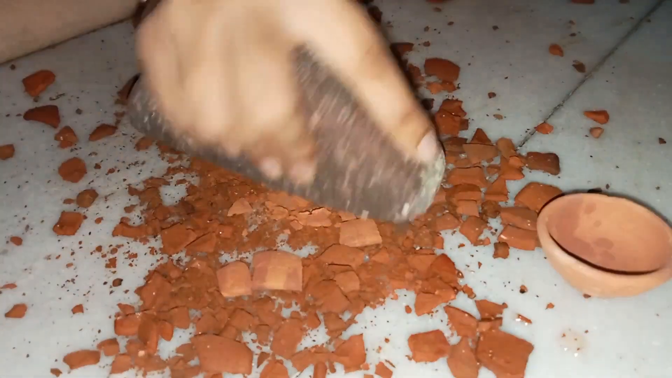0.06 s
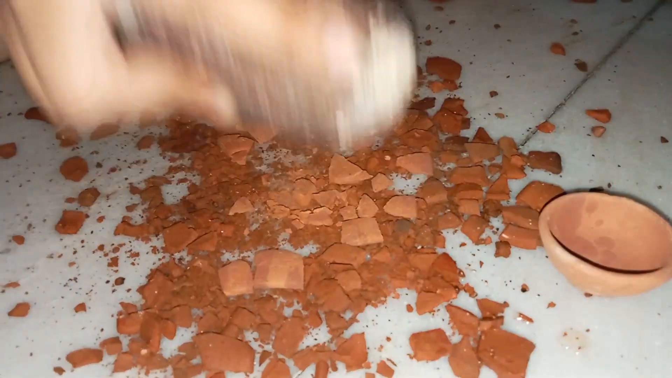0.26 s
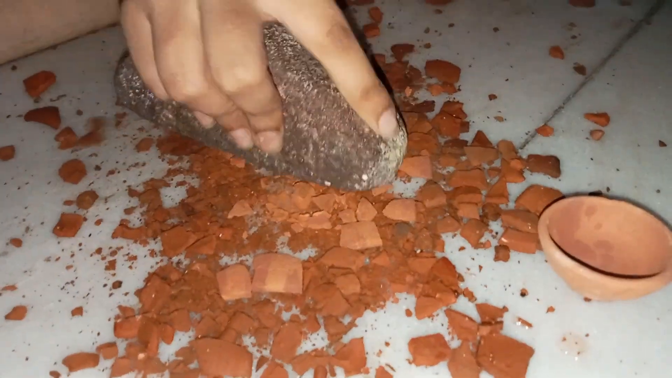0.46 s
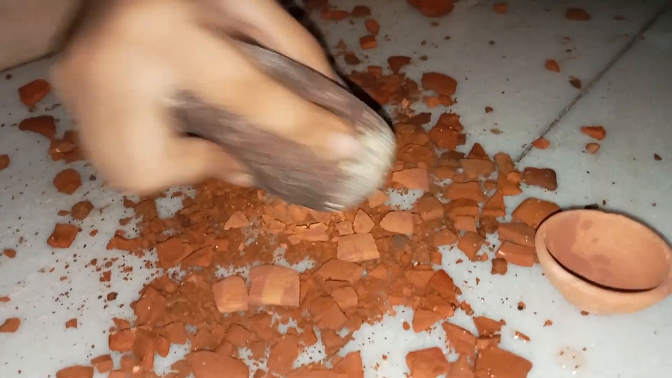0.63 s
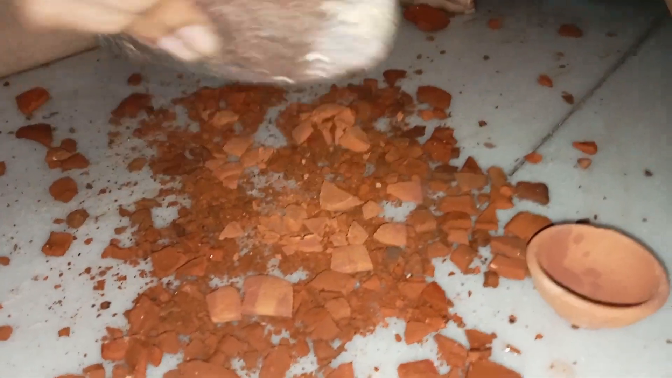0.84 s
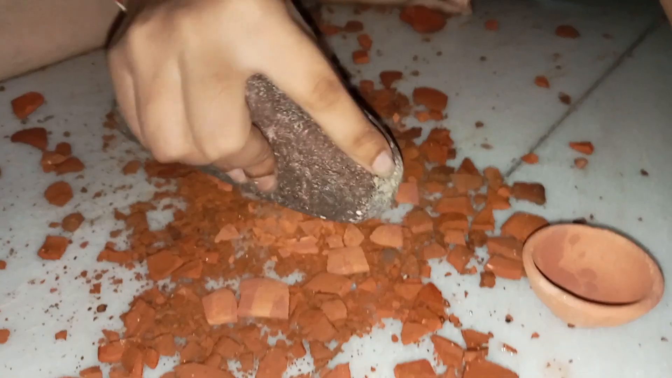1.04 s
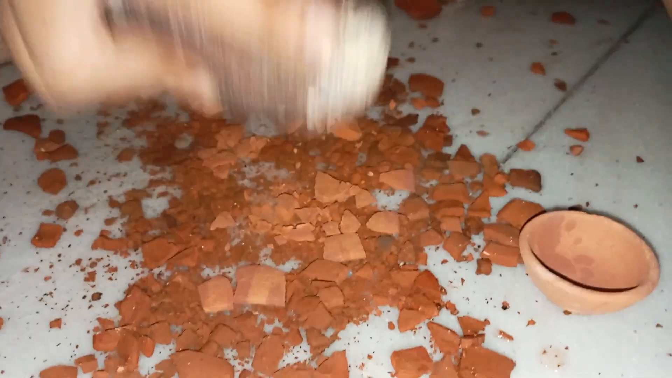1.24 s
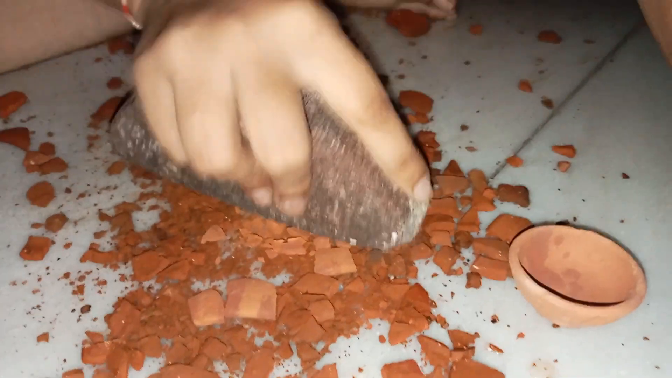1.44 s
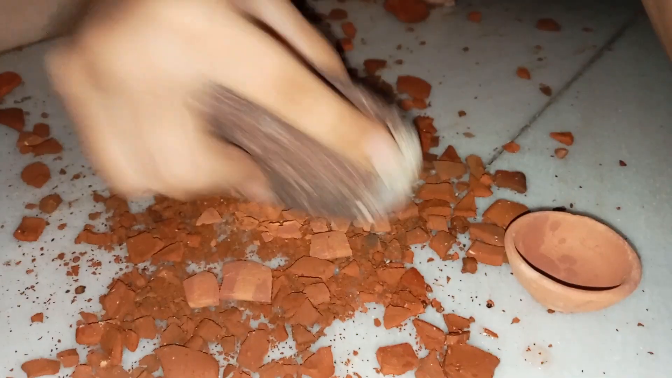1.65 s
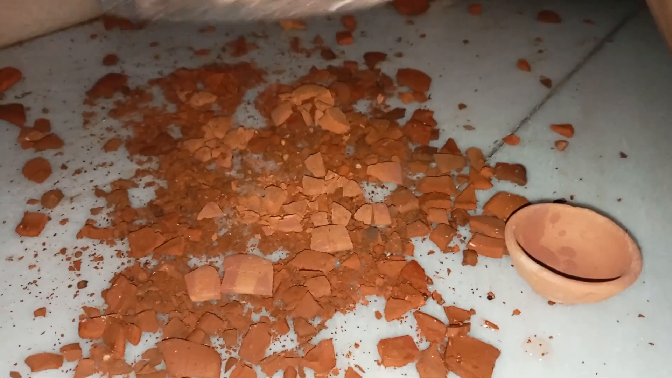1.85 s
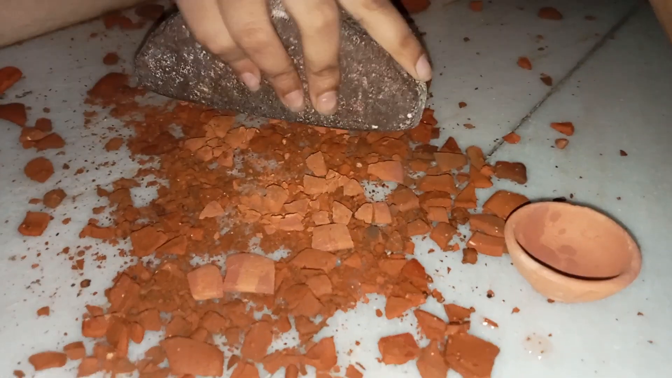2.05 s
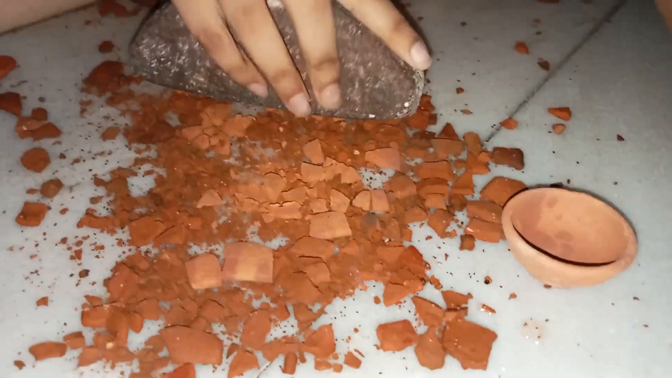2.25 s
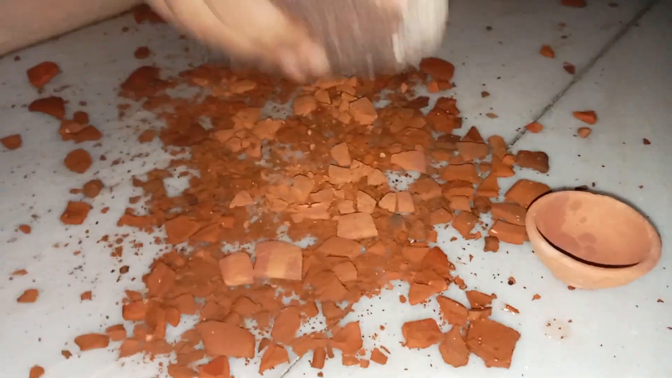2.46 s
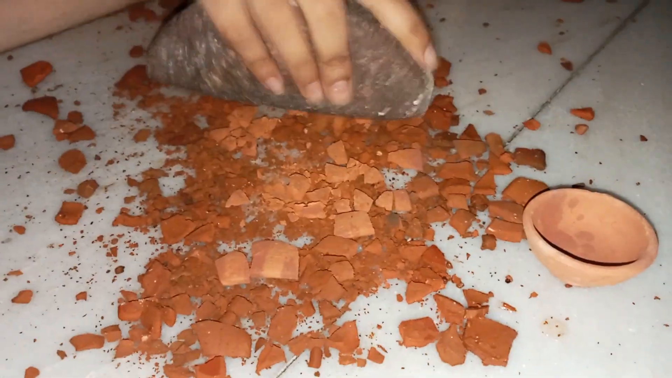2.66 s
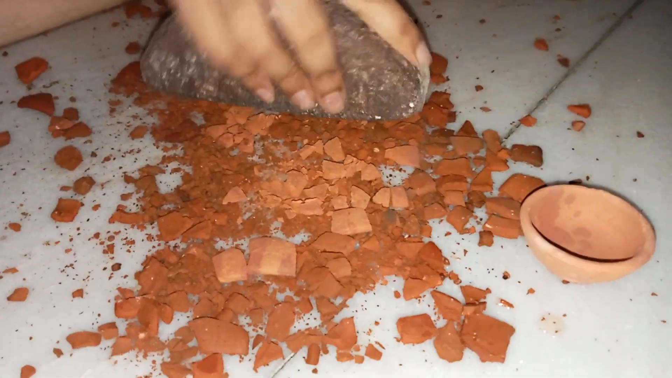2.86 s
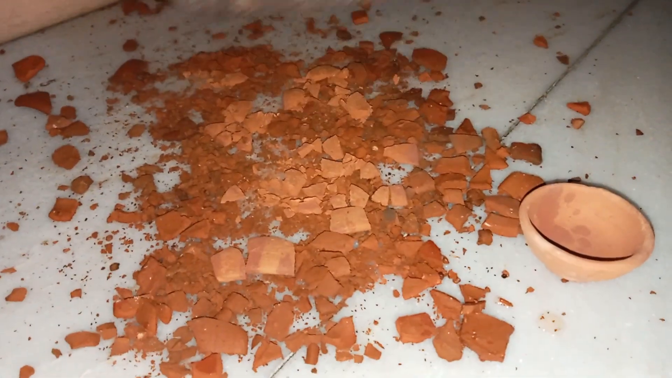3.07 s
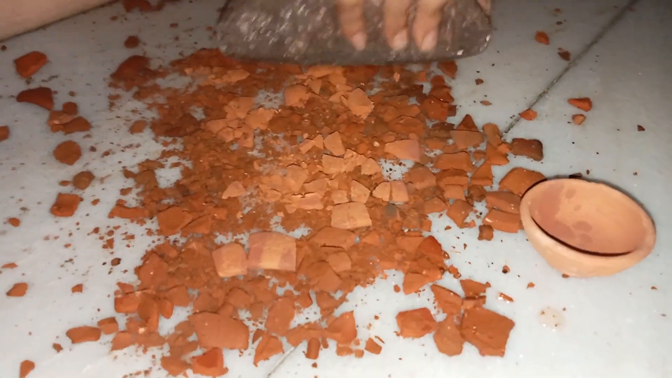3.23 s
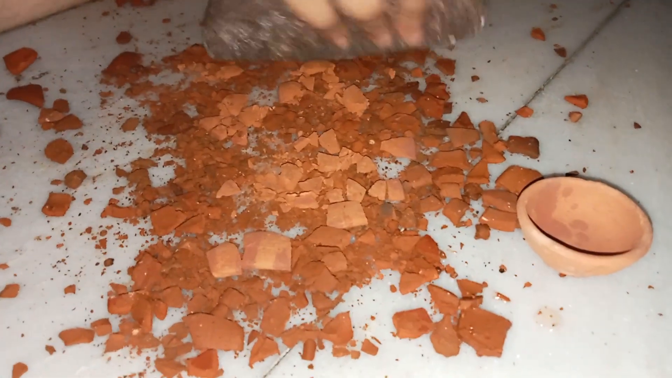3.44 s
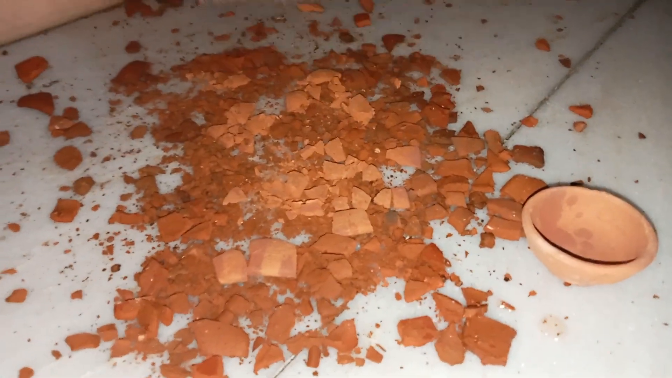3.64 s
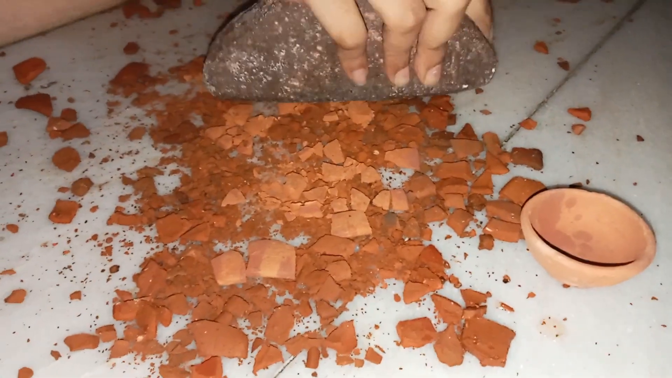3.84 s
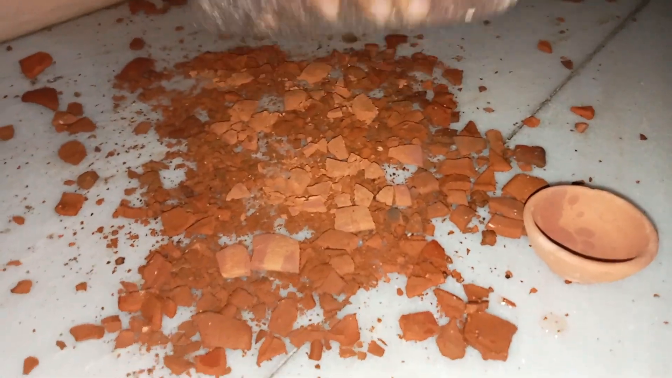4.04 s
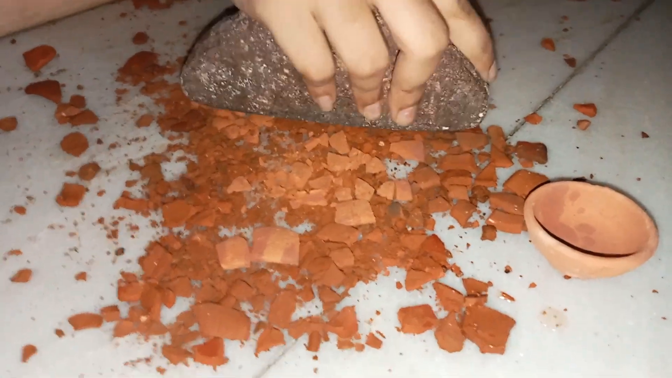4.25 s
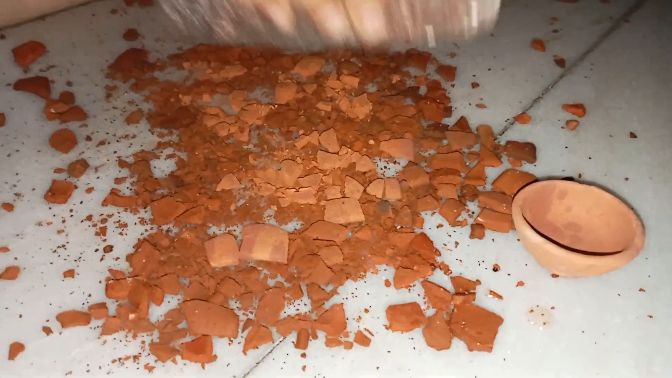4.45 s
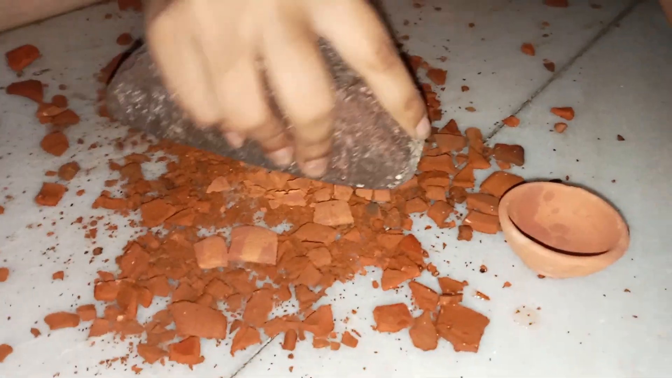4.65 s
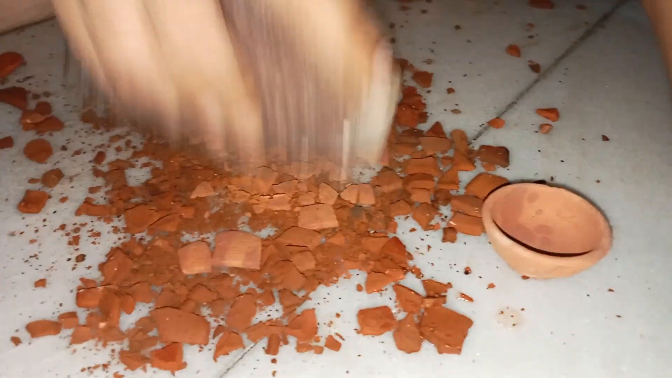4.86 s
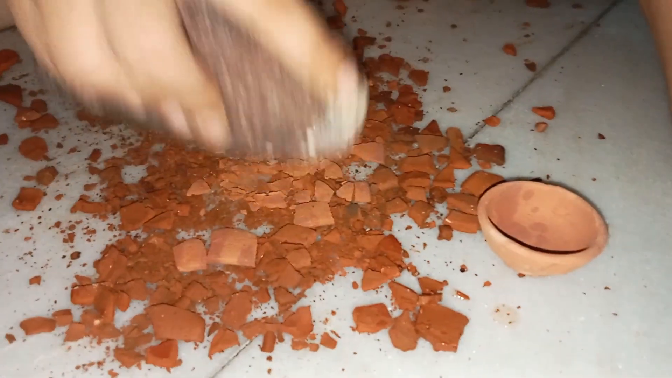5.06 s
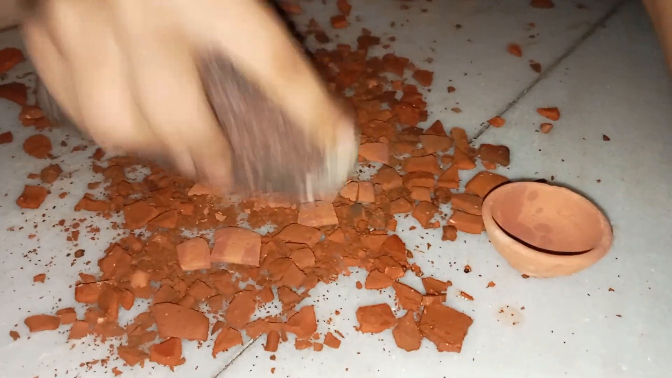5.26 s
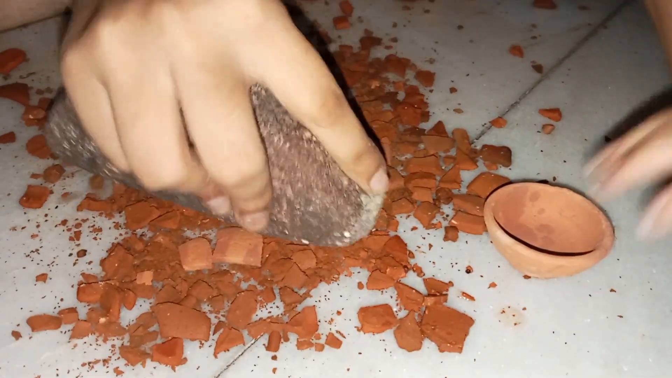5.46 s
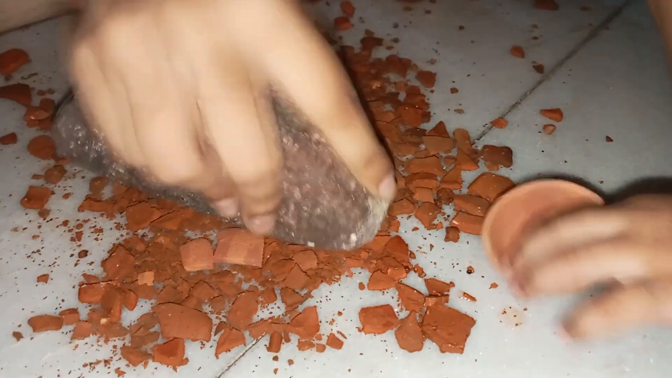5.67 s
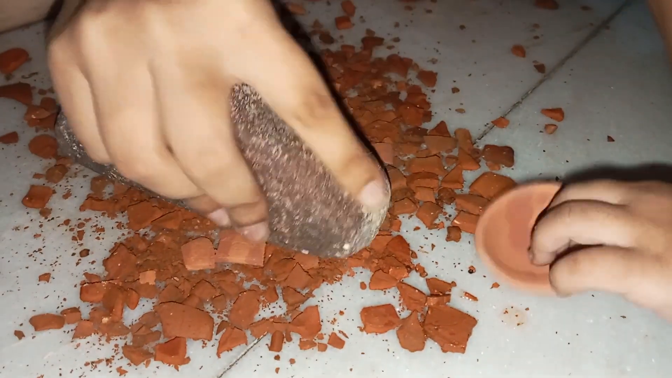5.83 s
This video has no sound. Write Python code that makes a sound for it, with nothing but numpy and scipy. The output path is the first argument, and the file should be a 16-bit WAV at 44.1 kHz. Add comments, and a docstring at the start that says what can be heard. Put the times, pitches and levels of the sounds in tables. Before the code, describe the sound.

Close, repeated knocks of a hand-held stone crushing pottery shards on tiles, with brief rattles and a short room echo.

```python
"""A sharp crack, knock and thud, close up: a hand-held stone pounds a heap of broken clay lamps on the
tiled floor of a bare room. Each blow crushes the top shards, then drives the floor; a short, bright
rattle follows about 13 ms later. Between blows crumbs tick, grit sifts and the room rings on over a
faint hiss. The microphone is close to the heap and overloads on the impacts."""
import sys
import numpy as np
from scipy import signal
from scipy.fft import rfft, irfft
from scipy.io import wavfile

SR = 44100
rng = np.random.default_rng(int(sys.argv[2]) if len(sys.argv) > 2 else 0)


def log_audio(samples):
    """Write samples as a 16-bit WAV file to the path given in sys.argv[1]."""
    # one column per channel
    frames = np.atleast_2d(samples).T
    # limit to full scale, then quantise
    limited = np.clip(frames, -1, 1)
    pcm = np.round(limited * 32767).astype(np.int16)
    wavfile.write(sys.argv[1], SR, pcm)


N = 260190
EVENT_SAMPLES = SR // 10
EVENT_T = np.arange(EVENT_SAMPLES) / SR


def from_db(db):
    """Decibels to gain."""
    return 10 ** (np.asarray(db) / 20)


def unit_rms(x):
    """Scale to rms 1."""
    return x / np.sqrt(np.mean(x ** 2) + 1e-20)


def at_hz(points, hz):
    """Read a table on a log-frequency axis."""
    freqs, values = np.array(points).T
    return np.interp(np.log(hz), np.log(freqs), values)


def add(out, s, sound):
    """Mix a sound in at time s."""
    i = max(round(s * SR), 0)
    out[i:i + len(sound)] += sound[:N - i]


def cut(x, hz, kind, order=2):
    """Butterworth filter."""
    return signal.sosfilt(signal.butter(order, np.clip(hz, 10, .48 * SR), kind, fs=SR, output="sos"), x)


def ring(force, modes):
    """Each mode answers a click with a dying sine."""
    out = 0
    for hz, db, t60 in modes:
        r, w = np.exp(-np.log(1000) / (t60 * SR)), 2 * np.pi * hz / SR
        out += signal.lfilter([0, from_db(db) * np.sin(w)], [1, -2 * r * np.cos(w), r * r], force + 1e-18)
    return out


def contact(hardness_hz, order=2):
    """The force of one contact: the softer it is, the longer and duller."""
    return cut(signal.unit_impulse(EVENT_SAMPLES) + 1e-18, hardness_hz, "low", order)


def fractures(envelope, cracks_per_s=12000, spread_db=3):
    """Tiny cracks of random size and sign, densely packed under an envelope."""
    born = rng.random(EVENT_SAMPLES) < cracks_per_s / SR
    sizes = from_db(spread_db * rng.standard_normal(EVENT_SAMPLES))
    return envelope * born * sizes * rng.choice([-1, 1], EVENT_SAMPLES)


# the background of the bare room: (frequency [Hz], relative density [dB])
HISS_SPECTRUM = [(20, -58), (40, -7), (110, 0.5), (200, 8), (600, -5), (1200, -4), (2500, -7.5),
                 (4000, -12.5), (4600, -19), (5300, -31.5), (7000, -39.5), (15000, -45.5)]


def hiss(level_db=-48.5):
    """Smooth, steady noise far behind the pounding."""
    hz = np.maximum(np.fft.rfftfreq(N, 1 / SR), 1)
    spectrum = rfft(rng.standard_normal(N)) * from_db(at_hz(HISS_SPECTRUM, hz))
    return from_db(level_db) * unit_rms(irfft(spectrum, N))


# what the walls send back to the microphone: (frequency [Hz], relative density [dB])
ECHO_SPECTRUM = [(50, -11.5), (100, -6.5), (160, -2), (230, 6), (330, 0), (550, 1.5), (800, 0), (1400, -10),
                 (2400, -5.5), (4000, -13.5), (6500, -13.5), (10000, -13.5), (15000, -19)]
# how long the room rings: (frequency [Hz], t60 [s])
ECHO_DECAY = [(80, 0.74), (210, 0.58), (560, 0.66), (1500, 0.69), (4000, 0.64), (10000, 0.42),
              (16000, 0.29)]
# standing waves between the walls: (frequency [Hz], gain [dB], t60 [s])
STANDING_WAVES = [(103.4, -76, 1.36), (158.92, -63.5, 0.36), (174.2, -62, 0.442)]


def room(x, build_s=.012, first_echo_s=.0056):
    """Dense echoes off the bare walls die band by band; a few standing waves hum on in the bass."""
    t = np.arange(SR) / SR
    onset = np.clip((t - first_echo_s) / build_s, 0, 1)
    edges_hz = np.geomspace(40, 17000, 22)
    white = rng.standard_normal((2, SR))
    response = 0
    for k, (low, high) in enumerate(zip(edges_hz, edges_hz[1:])):
        hz = np.sqrt(low * high)
        fade = np.exp(-np.log(1000) * t / at_hz(ECHO_DECAY, hz))
        band = unit_rms(cut(white[k % 2], [low, high], "band") * onset * fade)
        response += from_db(at_hz(ECHO_SPECTRUM, hz)) * band * np.sqrt(2 * (high - low)) / SR
    return signal.fftconvolve(x, response)[:N] + ring(x, STANDING_WAVES)


def blow_echoes(echo_variants=4, draws=2):
    """The room's diffuse echo, coloured a little differently from blow to blow."""
    groups = [STONE_BLOWS[k::echo_variants] for k in range(echo_variants)]
    return sum(room(blows(rows)[0]) for rows in groups for _ in range(draws)) / np.sqrt(draws)


def sifting(grains_per_s=2500, clump_db=4, fade_db_per_s=3, spray_db=-6):
    """Each blow sets fine grit sliding down the heap in little clumps, fading until the next one."""
    t = np.arange(N) / SR
    level_db = np.full(N, float(STONE_BLOWS[0][-1]))
    for s, *_, grit_db in STONE_BLOWS:
        level_db = np.where(t < s, level_db, grit_db - fade_db_per_s * (t - s))
    clumps = unit_rms(cut(rng.standard_normal(N), 14, "low"))
    born = rng.random(N) < grains_per_s / SR
    grains = born * rng.standard_normal(N) * from_db(clump_db * clumps)
    fizz = cut(grains, [9000, 10600], "band") + from_db(spray_db) * cut(grains, [4500, 15000], "band")
    return from_db(level_db) * unit_rms(fizz)


# the loudest crumbs dropping near the microphone: (time [s], peak level [dB])
CRUMB_TICKS = [(0.7874, -49), (0.809, -48.5), (0.844, -35.5), (3.474, -37.5), (4.718, -45), (5.883, -38)]
# the stone resting on the heap: (time [s], level [dB], pitch [Hz])
STONE_BUMPS = [(2.423, -30, 70.3), (2.471, -33, 143)]


def settling(chatter_s=.0043, bright_db=-7, bump_t60_s=.11):
    """Crumbs drop with short bright ticks, and the stone bumps softly as it is shifted."""
    out = np.zeros(N)
    for s, db in CRUMB_TICKS:
        chatter = fractures(np.exp(-EVENT_T / chatter_s))
        tick = cut(chatter, [2700, 4270], "band") + from_db(bright_db) * cut(chatter, [8500, 15000], "band")
        add(out, s, from_db(db) * tick / np.abs(tick).max())
    for s, db, hz in STONE_BUMPS:
        add(out, s, from_db(db) * ring(contact(hz * 2), [(hz, 0, bump_t60_s)]))
    return out


# resonances of the rattle just after each blow: (frequency [Hz], gain [dB], t60 [s])
RATTLE_MODES = [(1535, -4, 0.014), (2334, -0.5, 0.013), (2580, 7.5, 0.0084), (2920, -13.5, 0.0075),
                (4504, -12, 0.044)]


def rattle(decay_s=.003):
    """A short burst of clicks ringing near 2.6 kHz."""
    clicks = fractures(np.exp(-EVENT_T / decay_s))
    return unit_rms(cut(ring(clicks, RATTLE_MODES), [1300, 5000], "band"))


# large pieces breaking under the stone, close up: (time [s], level [dB])
LARGE_SNAPS = [(0.0539, -36.5), (0.5371, -26.5), (2.068, -42.5)]


def snaps(opening_s=.00061, running_s=.0024):
    """A crack runs through a large piece with a broad, bright burst."""
    out = np.zeros(N)
    envelope = np.minimum(EVENT_T / opening_s, 1) * np.exp(-EVENT_T / running_s)
    for s, db in LARGE_SNAPS:
        add(out, s, from_db(db) * unit_rms(cut(fractures(envelope), [3800, 8010], "band")))
    return out


# shards breaking on top of the heap: (frequency [Hz], width [Hz], level [dB])
SHARD_BANDS = [(1303, 450, -2), (1790, 1830, 3.5), (2780, 750, -5), (3870, 700, 5), (5200, 520, -13),
               (6730, 6900, -22), (9836, 1000, 4), (11780, 250, -5.5), (13900, 3200, -2.5)]


def crunch(crush_s, tilt_db, pivot_hz=4200, finest_hz=9200, packing_s=.0032, trickle_db=-25, trickle_s=.014):
    """Cracks swell as the stone bears down and die away as the heap packs; small shards ring higher."""
    peak_s = max(.64 * crush_s, 1e-4)
    after = np.maximum(EVENT_T - peak_s, 0)
    decay = np.exp(-after / packing_s) + from_db(trickle_db) * np.exp(-after / trickle_s)
    envelope = np.minimum(EVENT_T / peak_s, 1) * decay
    out = 0
    for hz, width, db in SHARD_BANDS:
        hz *= 1 + .02 * rng.standard_normal()  # no two pieces are the same size
        cracks = cut(fractures(envelope), [hz - width / 2, hz + width / 2], "band")
        octaves = np.log2(min(hz, finest_hz) / pivot_hz)
        out += from_db(db + tilt_db * octaves) * unit_rms(cracks)
    return out


# the tile and the stone on it, heard only close by: (frequency [Hz], gain [dB], t60 [s])
TILE_MODES = [(302, -3, 0.037), (341, -10, 0.042), (424, -6.5, 0.051), (540.8, 3, 0.038),
              (680.4, -5.5, 0.075), (865, -2.5, 0.034), (1284, -5.5, 0.058)]


def tile_ring(force, spread_db=2):
    """Each blow lands on another spot and so weights the tile's modes differently."""
    return ring(force, [(hz, db + spread_db * rng.standard_normal(), t60) for hz, db, t60 in TILE_MODES])


# the floor slab under the heap: (frequency at usual hardness [Hz], gain [dB], t60 [s])
SLAB_MODES = [(92, -10.5, 0.039), (150.3, 1.5, 0.021)]


def slab_thud(hardness_hz, usual_hardness_hz=760):
    """The slab gives way and pulls the air after it; a softer, thicker heap lowers the thud."""
    tuning = (hardness_hz / usual_hardness_hz) ** .28
    swing = ring(contact(hardness_hz=325), [(hz * tuning, db, t60) for hz, db, t60 in SLAB_MODES])
    return -cut(swing, 82.4, "high")


def knock(force, pitch_hz, slap_db=34, bounce_db=-1, cycles=11.5):
    """A broad slap, and the stone bouncing for a few cycles on the springy heap."""
    slap = from_db(slap_db) * cut(force, 220, "high")
    return slap + from_db(bounce_db) * ring(force, [(pitch_hz, 0, cycles / pitch_hz)])


# the stone striking the heap, close to the microphone; each level is relative to its own layer:
# (time [s], crushing before impact [s], thud [dB], knock [dB], knock pitch [Hz], hardness [Hz],
#  crunch [dB], crunch tilt [dB/octave], rattle [dB], grit afterwards [dB])
STONE_BLOWS = [(0.0554, 0.0013, 4.5, 2, 442, 1110, -42.5, -1.5, -40, -77),
               (0.5387, 0.0027, 7.5, -.5, 337, 800, -34.5, -2.5, -39, -63),
               (1.0415, 0.0017, 0, 1, 521, 787, -34.5, -4.5, -38.5, -76.5),
               (1.5325, 0.00177, 4.5, 1, 547, 914, -36.5, -2.5, -27.5, -86),
               (2.0702, .0017, 2, -10, 430, 595, -36, -3, -38, -79),
               (2.7551, .0014, 0, 0, 536, 1040, -39, -5.5, -42, -78),
               (3.303, 0.0019, -0.5, -5, 483, 645, -35.5, -2.5, -49, -87.5),
               (3.825, 0.0036, 2.5, -2.5, 324, 568, -35, -1.5, -35.5, -90),
               (4.2652, 0.0043, -5, -2, 294, 540, -38.5, -5, -42.5, -87.5),
               (4.6814, 0.0077, 3, 1, 382, 622, -44, -6.5, -38, -75.5),
               (4.9971, 0.0037, 3, -4, 280.5, 610, -48.5, -8, -31.5, -74),
               (5.2696, 0.0016, 1.5, -4, 527, 920, -48.5, -8.5, -38.5, -83),
               (5.5278, .0028, -1.5, -3.5, 336, 580, -39, -3.5, -47, -80),
               (5.7738, 0.0074, 2.5, -5, 365, 940, -46.5, -5.5, -38, -80)]


def blows(rows, rattle_delay_s=.0132, slab_lag_s=.0017, rise_s=.0006):
    """Crunch, knock, the slower swing of the slab, then the rattle; the tile's ringing is kept apart."""
    out, tile = np.zeros((2, N))
    for s, crush_s, thud_db, knock_db, pitch_hz, hardness_hz, crunch_db, tilt_db, rattle_db, _ in rows:
        add(out, s - crush_s, from_db(crunch_db) * crunch(crush_s, tilt_db))
        force = from_db(knock_db) * contact(hardness_hz, order=4)
        add(out, s - rise_s, knock(force, pitch_hz))
        add(tile, s - rise_s, tile_ring(force))
        add(out, s + slab_lag_s, from_db(thud_db) * slab_thud(hardness_hz))
        add(out, s + rattle_delay_s, from_db(rattle_db) * rattle())
    return out, tile


def scene(echo_db=-1.5):
    """Mono, from beside the heap: pounding, debris and tile in front, the room and the hiss behind."""
    pounding, tile = blows(STONE_BLOWS)
    debris = snaps() + settling() + sifting()
    echo = blow_echoes() + room(debris)
    return (pounding + debris + tile + from_db(echo_db) * echo + hiss())[None]


def record(dry, low_cut_hz=75, high_cut_hz=16000):
    """The close microphone drops the deep bass and overloads on the impacts; the top is cut."""
    dry = cut(dry, low_cut_hz, "high")
    overloaded = dry / (1 + dry ** 8) ** (1 / 8)
    return signal.sosfilt(signal.ellip(10, .1, 80, high_cut_hz, fs=SR, output="sos"), overloaded)


dry = scene()
out = record(dry)
log_audio(out)
```